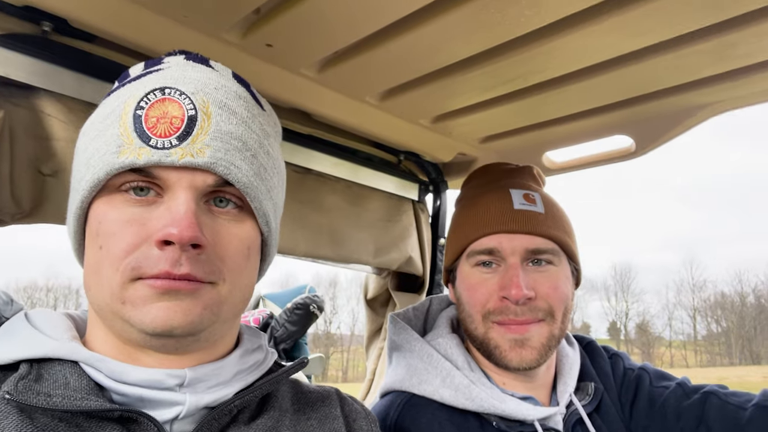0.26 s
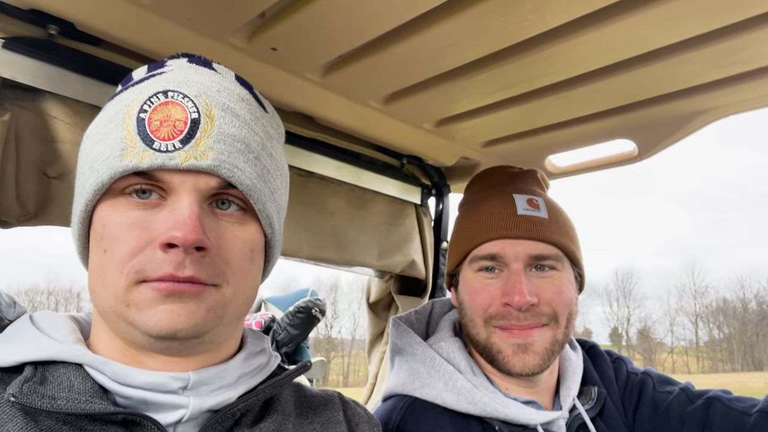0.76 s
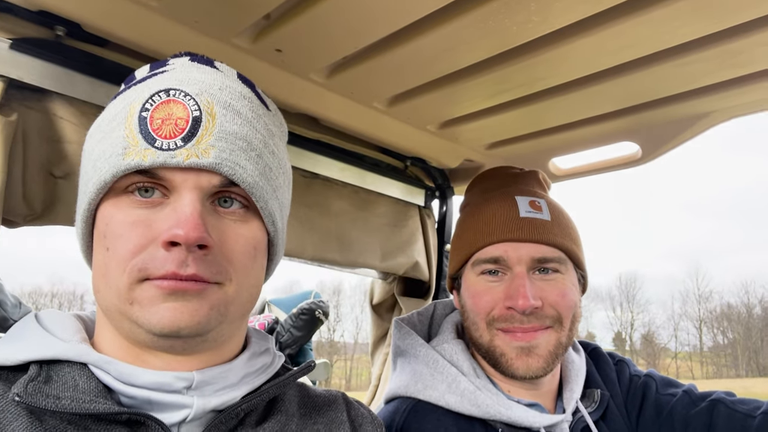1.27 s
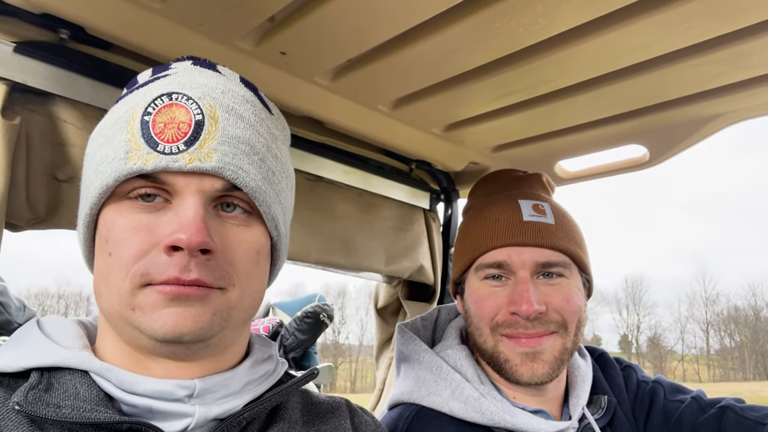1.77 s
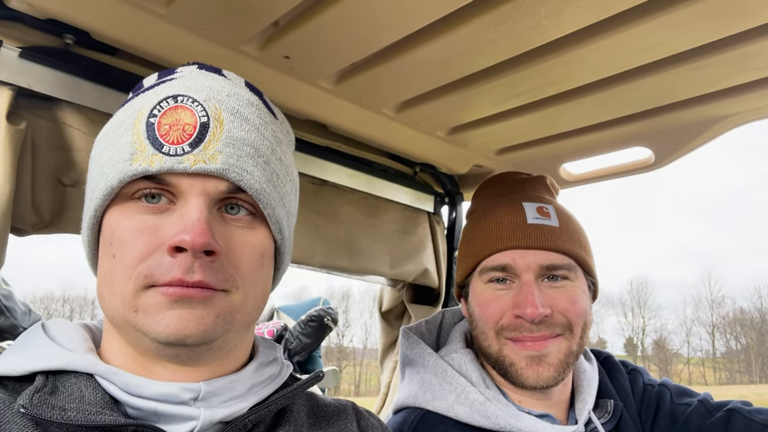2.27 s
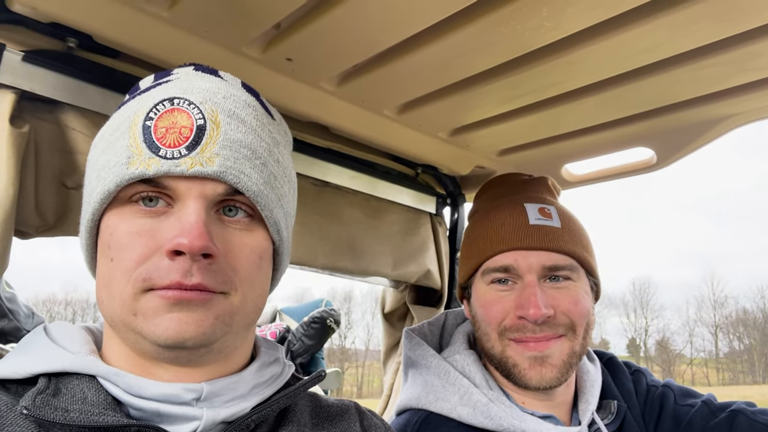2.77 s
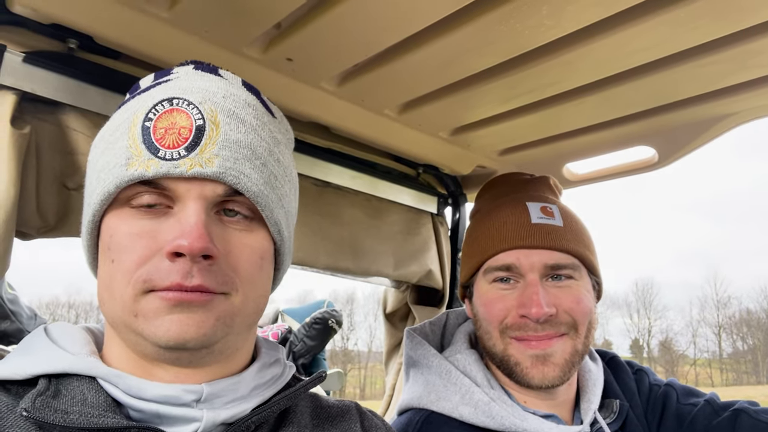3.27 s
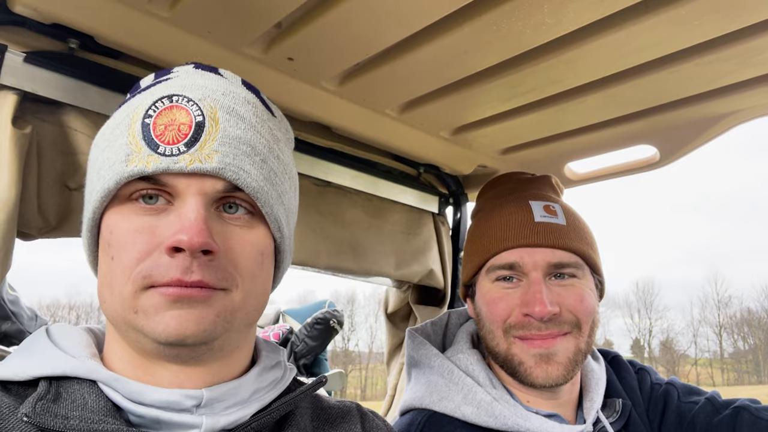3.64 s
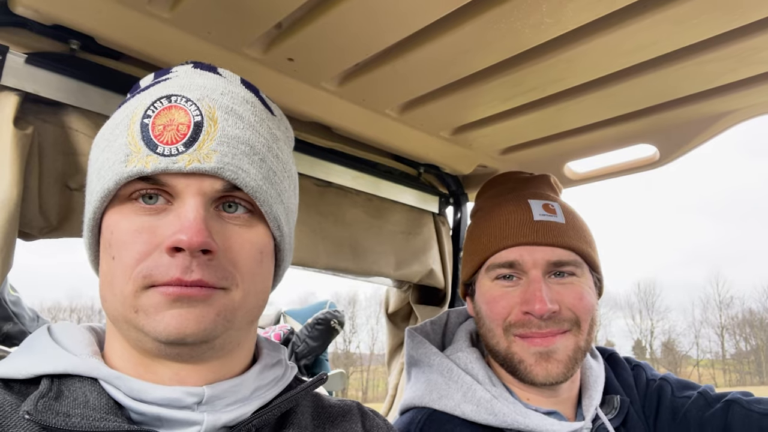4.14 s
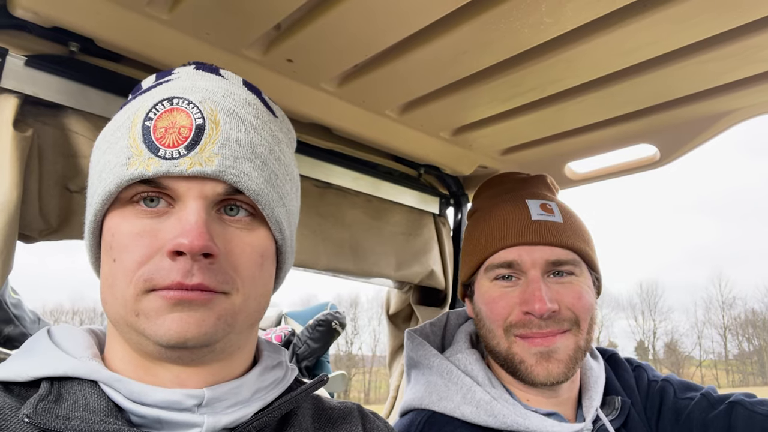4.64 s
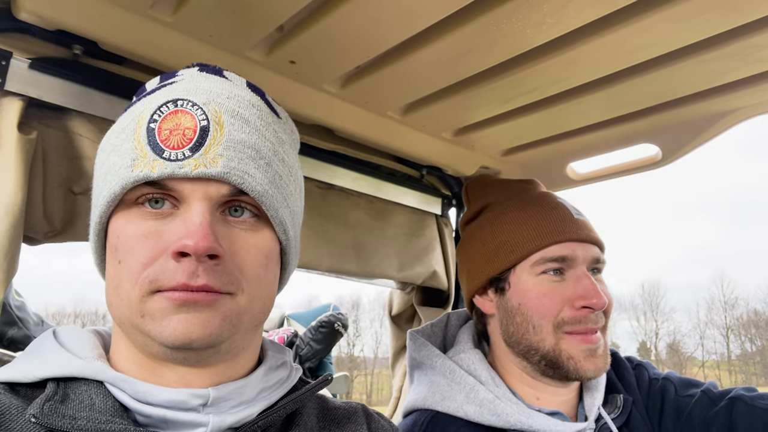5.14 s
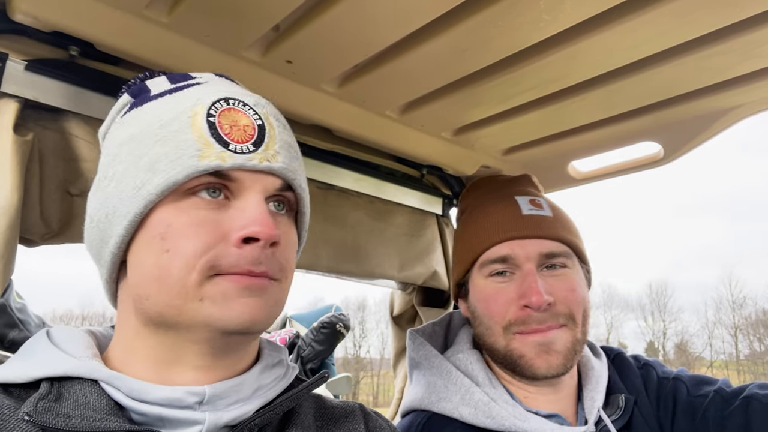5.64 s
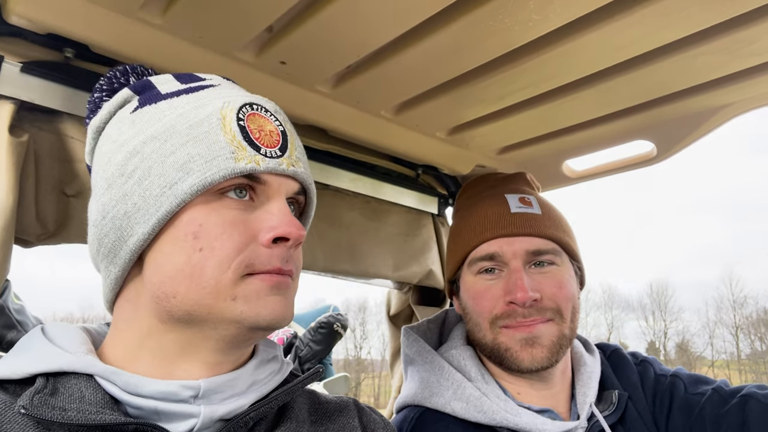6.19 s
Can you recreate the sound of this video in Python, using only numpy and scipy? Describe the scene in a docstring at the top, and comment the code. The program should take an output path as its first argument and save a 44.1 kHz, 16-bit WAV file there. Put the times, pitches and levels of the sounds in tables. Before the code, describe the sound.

Slow, even single-cylinder puttering with soft clatter and bumps runs five seconds before the throttle opens, the belt squeals and a deep drone climbs.

```python
"""A golf cart rolls over grass, heard from the seat under its roof.
At first its one-cylinder engine putters at idle: pulses ring the muffler over coloured mechanical noise.
Valve gear knocks at set points of the cycle, the belt chirps as a gliding sine, and thuds ring the body's modes.
Then the pedal goes down: the belt hisses as grainy noise, and the beats run together into a loud drone,
a sum of engine orders that swell as they pass resonances."""
import sys
import numpy as np
from scipy import signal
from scipy.fft import rfft, irfft, next_fast_len
from scipy.io import wavfile

SR = 44100
rng = np.random.default_rng(int(sys.argv[2]) if len(sys.argv) > 2 else 0)


def transcribe(u):
    """Save the signal u as a 16-bit wav file named by the first command-line argument.

    u: samples, shape (n,) or (channels, n), limited to [-1, 1]; the rate is SR.
    q: integer samples, one column per channel.
    """
    v = np.clip(np.atleast_2d(u).T, -1, 1)
    q = np.round(v * 32767).astype(np.int16)
    wavfile.write(sys.argv[1], SR, q)


N = 282974
TIME = np.arange(N) / SR
SIZE = next_fast_len(N + SR // 2)
FREQS = np.fft.rfftfreq(SIZE, 1 / SR)

# engine speed, idling and then pulling away: t/s, firing rate f/Hz
SPEED = [(0.0, 11.684), (0.9, 10.955), (1.5, 11.081), (1.9, 11.202), (2.6, 11.004), (3.3, 10.771),
         (4.3, 10.867), (5.0, 10.509), (5.01, 22), (5.07, 20.7), (5.14, 24), (5.22, 25.9), (5.3, 26.2),
         (5.38, 26.1), (5.45, 27.4), (5.506, 29.6), (5.596, 33), (5.692, 36.1), (5.806, 37.9),
         (5.952, 39.4), (6.05, 39.2), (6.2, 37.2), (6.42, 34.8)]
# the sound field between two microphones: f/Hz, likeness (0-1, scaled per noise),
# phase by which left leads/rad, left minus right level/dB
PORTS = [(48.6, 0.3, 0.5, 2), (99, 1, 0.47, -6), (218, 0.06, -0.13, -2.5), (350, 0.7, -1.5, -4.5),
         (620, 0.87, -2, -5.5), (1200, 0.06, -2, 0.5), (1830, 0.97, -4.5, 0), (2690, 0.06, -6, 1.5),
         (4800, 0.05, -10, 4), (7200, 0.04, -9.5, 7.5), (9150, 1, -40.5, -2), (14300, 0.8, -24.5, 1.5)]
# low thuds through the body: bumps, fuller idle thumps, and low thumps as the engine catches:
# t/s, relative level/dB, hardness/(dB per octave)
THUDS = [(1.25, -26.5, 2), (1.493, -25.5, 1.5), (1.535, -21, -2), (1.979, -18.5, 5), (2.035, -19, 1.5),
         (2.235, -26, 0), (2.672, -31.5, 4), (2.821, -31, -4), (3.194, -31, -3.5), (3.371, -28.5, -4.5),
         (3.466, -41, 7.5), (3.52, -27, 2.5), (3.589, -27.5, 4.5), (4.08, -26.5, 0.5), (4.953, -27, 0.5),
         (5.01, -22.5, -1.5), (5.594, -28, 7.5), (6.397, -29, 3)]


def amp(db):
    """Level to amplitude: 20 dB is a factor of ten."""
    return 10 ** (np.asarray(db) / 20)


def evened(x):
    """Normalisation to unit rms."""
    return x / np.sqrt(np.mean(x ** 2) + 1e-20)


def curves(rows, at=TIME):
    """Linear interpolation of a table's columns in time."""
    s, *columns = np.transpose(rows)
    return [np.interp(at, s, c) for c in columns]


def spectra(rows):
    """Linear interpolation of a table's columns over log frequency."""
    hz, *columns = np.transpose(rows)
    return [np.interp(np.log(FREQS + 1), np.log(hz), c) for c in columns]


def add(mix, s, sound):
    """Superposition: mixes a sound in at time s."""
    part = mix[..., max(round(s * SR), 0):][..., :sound.shape[-1]]
    part += sound[..., :part.shape[-1]]


def wander(rate):
    """Low-pass Gaussian noise of unit rms, its spectrum falling smoothly around the given rate in Hz."""
    steps = TIME[::32]
    hz = np.fft.rfftfreq(len(steps), steps[1])
    spectrum = rfft(rng.standard_normal(len(steps))) * np.exp(-(hz / rate) ** 2)
    return evened(np.interp(TIME, steps, irfft(spectrum, len(steps))))


def arch(at, middle, half_length):
    """A Gaussian swell from 0 to 1 and back, at 1/e one half length from its middle."""
    return np.exp(-np.minimum(((at - middle) / half_length) ** 2, 50))


def swells(rows):
    """Superposed Gaussian gains, each with its own time, length and level."""
    return sum(amp(db) * arch(TIME, middle, half_length) for middle, half_length, db in rows)


def bursts(times, delay, length):
    """A Gaussian pulse train: a swell from 0 to 1 and back, a delay after each of the times."""
    out, t = np.zeros(N), np.arange(SR // 8) / SR
    for s in times:
        add(out, s, np.exp(-((t - delay) / length) ** 2))
    return out


def bay_db():
    """Resonance: each mode of the engine bay and roof lifts a band around its own pitch."""
    # resonances: f/Hz, full width at half the lift in dB/Hz, lift/dB
    modes = [(239, 13, 7.5), (410.6, 25, 5), (615, 3.3, 6.5), (876.3, 15, 14), (961, 31, 4.5),
             (1301, 40, 11), (1525, 71, 6.5), (1780, 73, 1.5), (2678, 21, 11), (4130, 600, 5.5)]
    return sum(db / (1 + (2 * (FREQS - hz) / width) ** 2) for hz, width, db in modes)


def peak_db(hz, half_width):
    """A resonance curve: the level is 6 dB down at one half width from its peak."""
    return -20 * np.log10(1 + ((FREQS - hz) / half_width) ** 2)


def at_ports(left, right):
    """Interchannel phase and level differences turn two spectra into the sound at two microphones."""
    _, phase, side_db = spectra(PORTS)
    lean = amp(side_db)
    pair = np.array([left * lean * np.exp(1j * phase), right])
    return irfft(pair * np.sqrt(2 / (1 + lean ** 2)), SIZE)[:, :N]


def noise(colour_db, likeness=0.63):
    """Partial coherence: coloured noise of unit rms, partly shared by both microphones."""
    same = np.clip(likeness * spectra(PORTS)[0], 0, 1)
    a, b = rfft(rng.standard_normal((2, SIZE))) * amp(colour_db)
    return evened(at_ports(a, same * a + np.sqrt(1 - same ** 2) * b))


def ringing(colour_db):
    """Minimum phase: the causal response with this colour, scaled so that a click peaks at 1."""
    cepstrum = irfft(colour_db * np.log(10) / 20, SIZE)
    causal = (np.arange(SIZE) < SIZE // 2) * (np.arange(SIZE) > 0)
    response = np.exp(rfft(2 * cepstrum * causal))
    return response / abs(irfft(response, SIZE)).max()


def firings():
    """Phase accumulation: the exhaust valve opens each time the summed firing rate passes a whole cycle."""
    cycles = np.cumsum(curves(SPEED)[0]) / SR - .06
    return TIME[1:][np.diff(np.floor(cycles)) > 0]


def octaves(rate):
    """Logarithmic speed: octaves from the top firing rate."""
    return np.log2(rate / max(top for _, top in SPEED))


def throttle_at(at):
    """Piecewise linear control: how far the throttle is open at these times, 0 to 1."""
    # the pedal goes down in two pushes, then eases: t/s, throttle (0-1)
    pedal = [(4.87, 0), (4.94, 0.6), (5.1, 0.75), (5.25, 0.88), (6.14, 0.7), (6.3, 0.74)]
    return np.clip(curves(pedal, at)[0], 0, 1)


def load_at(at):
    """Lag: the load on the engine, 0 to 1, follows the opening throttle a little later."""
    lag_s = .14
    return np.minimum(throttle_at(at), throttle_at(at - lag_s))


def roughness(at):
    """Gaussian envelopes: a rough patch around each thud lifts the tyre rumble, in dB."""
    share, half_length_s, faint_thud_db = 0.21, 0.34, -53.5
    lifts = [share * (db - faint_thud_db) * arch(at, s, half_length_s) for s, db, _ in THUDS]
    return np.max(lifts, axis=0)


def exhaust(times, shut_db, open_db, pipe_delay, uneven_db, open_uneven_db, between):
    """Impulse response: firings ring the muffler; load gives sharper, less even beats that grow with speed."""
    # colour of a beat through the muffler, throttle shut: f/Hz, relative level/dB
    shut_colour = [(20, -40.5), (32, -34.5), (46, -5.5), (74, -8), (108, 4), (126, 1), (150, -9.5),
                   (180, -28), (250, -46), (430, -46.5), (1300, -61.5), (3000, -85.5)]
    # colour of a beat, throttle open: f/Hz, relative level/dB
    open_colour = [(20, -42), (38, -27.5), (52, -4.5), (76, -3.5), (90, -4.5), (107, 2), (122, 4.5),
                   (135, -1.5), (157, -13), (192, -26.5), (237, -27.5), (315, -44.5), (620, -57.5),
                   (1300, -52), (4000, -75), (12000, -120)]
    # softer beats: the weak first beat as the engine catches, a longer soft spell pulling away,
    # a brief dip: middle t/s, half length/s, level change/dB
    soft_spells = [(5.055, .02, -7), (5.34, .21, -4.8), (5.635, .015, -3)]
    beat_db_per_octave, afterbeat_per_db = 5, .04  # afterbeat: share of its thump per dB of roughness
    load = load_at(times)
    rate = curves(SPEED, times)[0]
    size = amp((uneven_db + open_uneven_db * load) * rng.standard_normal(len(times)))
    size *= amp(sum(db * arch(times, middle, half_length) for middle, half_length, db in soft_spells))
    at = np.round(abs(times + pipe_delay) * SR).astype(int)
    soft, hard = np.zeros((2, SIZE))
    soft[at] = amp(shut_db) * size * (1 - load) ** 2
    # on rough turf the thumps vary, each with a small random afterbeat
    after = np.round(rng.uniform(.008, .03, len(times)) * SR).astype(int)
    soft[at + after] = afterbeat_per_db * roughness(times) * soft[at]
    hard[at] = amp(open_db + beat_db_per_octave * octaves(rate)) * size * load
    # while the engine labours at low speed, the crank's second turn adds a weaker beat
    labour = np.clip((35 - rate) / 4, 0, 1) * (rate > 23)
    half_cycle = np.round(SR / rate / 2).astype(int)
    hard[at + half_cycle] = between * labour * hard[at]
    total = rfft(soft) * ringing(spectra(shut_colour)[0] + bay_db())
    total = total + rfft(hard) * ringing(spectra(open_colour)[0] + bay_db())
    return at_ports(total, total)


def clatter(times, shut_db, open_db, throb, flutter_db, idle_ring):
    """Amplitude modulation: idle noise gives way to intake roar that throbs with each firing."""
    # colour of the noise: f/Hz, relative level with throttle shut/dB, relative level with it open/dB
    colours = [(60, 2, -1.5), (177, -3.5, 1.5), (342, 0.5, -12.5), (434, -7, -11), (760, -9.5, -8.7),
               (1075, -15.5, -17.5), (1910, -18, -14.5), (2880, -21.5, -25), (4870, -31.5, -35),
               (6200, -27, -25.5), (8020, -33.5, -37.5), (8700, -52, -71.5), (10400, -40, -48),
               (12400, -42, -50), (14000, -58, -67)]
    roar_db_per_octave, throttle_db = 7.5, 11.5  # throttle_db: rise per unit of throttle
    throttle = throttle_at(TIME)
    shut, wide = spectra(colours)
    idle = amp(shut_db) * noise(shut + idle_ring * bay_db(), likeness=0.22)
    roar = amp(open_db + roar_db_per_octave * octaves(curves(SPEED)[0]))
    roar = roar * noise(wide + bay_db(), likeness=1.6)
    roar *= 1 + throb * bursts(times, delay=0.019, length=0.011)
    blend = np.sqrt(1 - throttle) * idle + np.sqrt(throttle) * roar
    return amp(throttle_db * throttle + flutter_db * wander(rate=35)) * blend


def ride(lumpy_db, thud_db, contact):
    """Modal excitation: tyres rumble over the turf, and low thuds ring the body's decaying modes."""
    # colour of tyres on turf: f/Hz, relative level/dB
    turf_colour = [(15, -44), (30, -17), (45, 1), (65, 7), (110, -9.5), (150, -5), (220, -20), (400, -52),
                   (1000, -81)]
    # modes of the body: nominal f/Hz (detuned at each thud), relative level/dB, t60/s
    body_modes = [(52.5, -8.5, 0.16), (71, 9, 0.17), (124, 1, 0.24), (198, 0.5, 0.1), (242, -7, 0.099),
                  (354, -7.5, 0.088), (402, -14, 0.098), (540, -17, 0.029), (650, -28, 0.12),
                  (796, -33.5, 0.075)]
    smooth_db, load_db = -37, 3  # level on smooth turf, and its rise per unit of load
    rumble_db = smooth_db + roughness(TIME) + load_db * load_at(TIME) + lumpy_db * wander(rate=11.0)
    rumble = amp(rumble_db) * noise(spectra(turf_colour)[0])
    thuds, t = np.zeros(N), np.arange(SR // 3) / SR
    for s, db, hardness in THUDS:
        ring = np.zeros(len(t))
        for hz, mode_db, t60 in body_modes:
            decay = amp(mode_db + hardness * np.log2(hz / 125) - 60 * t / t60)
            ring += decay * np.sin(2 * np.pi * hz * rng.uniform(0.867, 1.03) * t)
        add(thuds, s, amp(db + thud_db) * ring * (1 - np.exp(-t / contact)))
    thuds = rfft(thuds, SIZE)
    return rumble + at_ports(thuds, thuds)


def cycle_sounds(times, level_db, scatter_db, slack, rise):
    """Cyclic excitation: valve gear and piston knock, and the belt chirps faintly, at set points of the cycle."""
    # knocks and a faint chirp: place in the cycle (0-1), relative level/dB, f/Hz, half width/Hz,
    # decay time to 1/e/s
    strike_table = [(.2, -46.5, 353, 30, 0.016), (.5, -51, 551, 30.3, 0.05),
                    (.36, -55, 1922, 34.24, 0.0098), (.19, -52.5, 1312, 70, 0.006),
                    (.25, -60.5, 2650, 303.4, 0.011), (.26, -54.5, 3740, 521, .005),
                    (.55, -61, 4380, 200, 0.0044), (.56, -59.5, 2690, 131, 0.0066),
                    (.1, -60, 2610, 40, 0.019), (.75, -63, 2845, 39, 0.016), (0.61, -55, 1323, 70, 0.011),
                    (.85, -59, 6700, 1100, 0.0085), (0.86, -67.5, 11200, 1100, 0.013),
                    (0.918, -48.5, 856, 47, 0.012)]
    out, t = np.zeros((2, N)), np.arange(SR // 16) / SR
    for place, db, hz, half_width, decay in strike_table:
        strikes = np.zeros(N)
        envelope = (1 - np.exp(-t / (rise * decay))) * np.exp(-t / decay)
        scatter = rng.standard_normal((len(times), 2))
        for s, period, (size, late) in zip(times, np.diff(times), scatter):
            add(strikes, s + period * (place + slack * late), amp(scatter_db * size) * envelope)
        out += amp(db + level_db) * strikes * noise(peak_db(hz, half_width), likeness=1.0)
    return out


def rattles(level_db, width):
    """Damped band noise: loose fittings, panels and the pedal linkage rattle, each around its own pitch."""
    # rattles: t/s, relative level/dB, decay time to 1/e/s, centre f/Hz
    loose_parts = [(0.033, -53, 0.044, 3970), (0.108, -54.5, 0.076, 3510), (0.365, -53, 0.0093, 1200),
                   (1.009, -43, 0.014, 1390), (1.009, -51, 0.0088, 3600), (1.982, -26, .009, 350),
                   (2.031, -30, .007, 310), (2.895, -44, 0.021, 1200), (2.897, -40, 0.032, 557),
                   (3.148, -49, .015, 650), (3.464, -45, 0.022, 700), (3.561, -53, 0.011, 3340),
                   (3.575, -52.5, 0.05, 2300), (3.62, -53.5, 0.089, 2370), (3.699, -41, 0.015, 880),
                   (3.819, -50.5, 0.03, 2270), (4.933, -43, 0.012, 5800), (4.934, -46, .018, 2300),
                   (5.035, -42.5, 0.0028, 5000), (5.036, -51, .002, 13000), (5.065, -47.5, 0.0044, 6000),
                   (5.218, -49, 0.0027, 6700), (5.28, -36, .012, 800), (5.826, -46, .004, 6500),
                   (5.826, -52, 0.0034, 12500), (6.108, -43.5, 0.006, 4870)]
    out, t = np.zeros((2, N)), np.arange(SR // 5) / SR
    for s, db, decay, hz in loose_parts:
        edges = [hz / (1 + width), min(hz * (1 + width), SR / 2 - 1)]
        band = signal.butter(2, edges, "bandpass", fs=SR, output="sos")
        grain = evened(signal.sosfilt(band, rng.standard_normal((2, len(t)))))
        add(out, s, amp(db + level_db) * np.exp(-t / decay) * grain)
    return out


def squeak(hz, half_width_hz):
    """Narrow-band noise: a thin, fuzzy whistle far above the engine comes and goes."""
    # swells of the whistle: middle t/s, half length/s, level/dB
    whistles = [(.13, 0.029, -69), (6.35, 0.12, -64)]
    return swells(whistles) * noise(peak_db(hz, half_width_hz), likeness=5.3)


def chirps(level_db, fall_hz_per_s, length, waver_hz, pan_db):
    """Frequency modulation: the belt squeaks in short chirps; each lower squeak sinks steadily in pitch, while
    the higher ones hold theirs."""
    # belt chirps: middle t/s, relative level/dB, middle f/Hz before the waver
    belt_table = [(.487, -54, 1940), (.655, -56.5, 1940), (1.031, -52.5, 3470), (1.12, -51.5, 3460),
                  (1.205, -64, 3495), (1.297, -60, 3460), (1.38, -58, 1925), (1.475, -54.5, 1916),
                  (1.57, -55, 1916), (1.66, -58, 1920), (1.75, -59, 1940), (1.835, -53, 1900),
                  (1.918, -51.5, 1980), (2.012, -50.5, 1920), (2.105, -54, 1920), (2.192, -60, 3570),
                  (2.198, -61, 1910), (2.285, -55, 1910), (2.372, -62, 3480), (2.46, -60, 1920),
                  (2.55, -57, 1870), (2.647, -57, 1920), (3.097, -53.5, 1906), (3.105, -63, 3830),
                  (3.192, -55, 1920), (3.292, -57, 1890), (3.38, -64, 3565), (3.383, -57, 1915),
                  (3.472, -53, 1890), (3.565, -58, 3495), (3.657, -51.5, 1890), (3.755, -64, 3570),
                  (3.757, -60, 1930), (3.85, -55, 1910), (3.945, -60, 1930), (4.12, -56.5, 1840),
                  (4.21, -52, 1914), (4.307, -53, 1914), (4.402, -62, 3450), (4.403, -56, 1910),
                  (4.495, -62, 1910), (4.583, -61, 1920), (4.67, -58, 1890), (4.765, -61, 1900),
                  (4.86, -65, 1910), (5.06, -53, 1940), (5.345, -58, 2020), (5.358, -46.5, 2560),
                  (5.375, -51, 2170)]
    steady_above_hz = 3000  # from this pitch up a chirp does not sink
    out, t = np.zeros(N), np.arange(-SR // 25, SR // 25) / SR
    waver = waver_hz * wander(rate=94)
    for s, db, hz in belt_table:
        fall = fall_hz_per_s * (hz < steady_above_hz) * t
        pitch = hz - fall + np.resize(waver[round(s * SR):], len(t))
        tone = np.sqrt(2) * np.sin(2 * np.pi * np.cumsum(pitch) / SR)
        add(out, s + t[0], amp(db + level_db) * arch(t, 0, length) * tone)
    tone = rfft(out, SIZE)
    return at_ports(tone * amp(pan_db), tone * amp(-pan_db))


def clutch(steady_db, grain_db):
    """Friction noise: the belt scrubs the pulley faces under throttle in fine grains, harder when it slips."""
    # the belt slips each time the clutch grabs: middle t/s, half length/s, level before graining/dB
    slips = [(4.96, 0.062, -68), (5.265, 0.043, -52.5), (5.355, 0.058, -50), (5.5, 0.028, -54.5)]
    # colour of the scrubbing: f/Hz, relative level/dB
    hiss_colour = [(500, -32), (1500, -7), (2100, 5), (2600, -5), (3100, 1), (4800, -7), (6800, -4.5),
                   (9000, -23.5), (12000, -12.5), (15500, -34.5)]
    scrub = amp(steady_db) * throttle_at(TIME) + swells(slips)
    grains = amp(grain_db * np.tanh(wander(rate=170)))
    return scrub * grains * noise(spectra(hiss_colour)[0], likeness=.6)


def drone(level_db, half_db, waver_db):
    """Harmonic synthesis: under load, engine orders and weak half orders swell as they pass frame resonances."""
    # how strongly the frame gives out an order at each pitch: f/Hz, relative level/dB
    frame = [(55, -42), (110, -42), (175, -46), (235, -47.5), (330, -52), (400, -45.5), (440, -48),
             (520, -45), (640, -46.5), (780, -54), (880, -55.5), (980, -53), (1300, -62)]
    # orders that stand out or hang back: multiple of the firing rate, extra level/dB
    loud_orders = [(2.5, 21), (3.5, 20), (5, 2), (6, -13), (7, 7), (8, 3), (9, 4), (11, 8), (12, -2),
                   (15, 1), (16, 3), (22, -6), (23, -2)]
    # at low speed the upper orders fade: dB per octave of speed and per octave of pitch, from this pitch up
    dulling_db, dulling_from_hz = 11, 250
    load = load_at(TIME)
    on = load > 0
    rate = curves(SPEED)[0]
    cycles = (np.cumsum(rate) / SR)[on]
    frame_db, out = spectra(frame)[0] + bay_db(), np.zeros(N)
    for order in np.arange(2, 33, .5):
        extra_db = half_db * (order % 1 > 0)
        extra_db += sum(db for multiple, db in loud_orders if multiple == order)
        hz = order * rate[on]
        dull_db = dulling_db * octaves(rate[on]) * np.log2(np.maximum(hz / dulling_from_hz, 1))
        db = np.interp(hz, FREQS, frame_db) + extra_db + dull_db + waver_db * wander(rate=6.9)[on]
        out[on] += amp(db) * np.sin(2 * np.pi * (order * cycles + rng.random()))
    tone = rfft(amp(level_db) * np.sqrt(2) * load ** 2 * out, SIZE)
    return at_ports(tone, tone)


def boom(engine, ring_s):
    """Order tracking: an order at a resonance builds up and rings between beats, gliding with the crank."""
    # orders that boom or sink in pipe and frame: middle t/s, half length/s, multiple of firing rate, lift/dB
    lifted_orders = [(5.17, .075, 4, 7.5), (5.185, .055, 7, 14), (5.285, .045, 5, 7.5), (5.3, .12, 11, -7),
                     (5.35, .11, 2, 4), (5.38, .08, 3, 8), (5.55, .06, 2, 4), (5.55, .08, 7, 5.5),
                     (5.6, .05, 4, -3)]
    cycles, window = np.cumsum(curves(SPEED)[0]) / SR, np.hanning(round(ring_s * SR))
    out = engine.copy()
    for middle, half_length, order, db in lifted_orders:
        # shift the order to 0 Hz, smooth it there, then shift it back
        turn = np.exp(2j * np.pi * order * cycles)
        line = signal.oaconvolve(engine / turn, window[None] / window.sum(), "same")
        out += (amp(db) - 1) * arch(TIME, middle, half_length) * 2 * (line * turn).real
    return out


def scene():
    """Superposition of engine, belt, body and whistle."""
    times = firings()
    engine = exhaust(times, shut_db=-13.0, open_db=-7.0, pipe_delay=0.003045, uneven_db=0.06,
                     open_uneven_db=2.03, between=.42)
    engine += drone(level_db=3.8, half_db=-19, waver_db=2)
    engine = boom(engine, ring_s=.11)
    engine += clatter(times, shut_db=-44.5, open_db=-47.5, throb=1.0, flutter_db=1, idle_ring=0.81)
    engine += cycle_sounds(times, level_db=3.5, scatter_db=2, slack=.012, rise=.6)
    body = ride(lumpy_db=2, thud_db=-3, contact=0.0022)
    body += rattles(level_db=-1, width=0.25)
    whistle = squeak(hz=11500, half_width_hz=350)
    belt = chirps(level_db=1.5, fall_hz_per_s=4200, length=.0105, waver_hz=14, pan_db=-1)
    belt += clutch(steady_db=-61.5, grain_db=4.0)
    return engine + belt + body + whistle


def record(dry):
    """Band limitation: a linear-phase low-pass filter removes the highest treble."""
    edge_hz = 15750
    low_pass = signal.firwin(511, edge_hz, window=("kaiser", 9), fs=SR)
    return signal.oaconvolve(dry, low_pass[None], "same")


dry = scene()
out = record(dry)
transcribe(out)
```